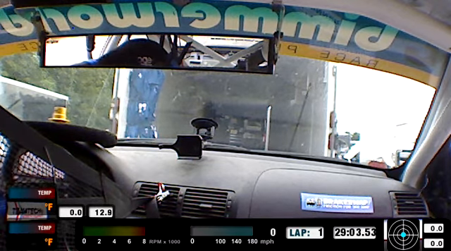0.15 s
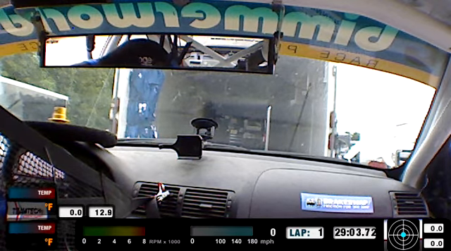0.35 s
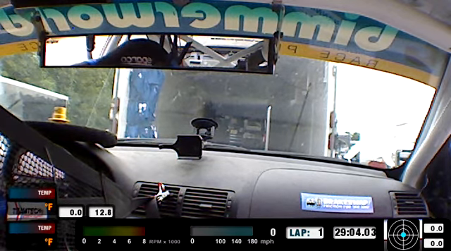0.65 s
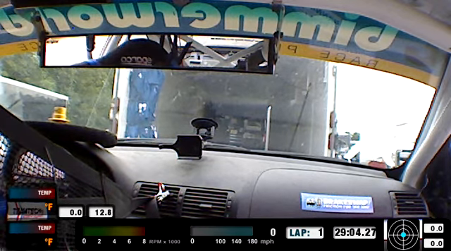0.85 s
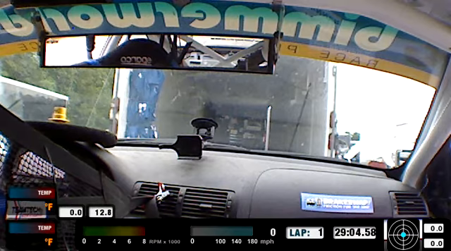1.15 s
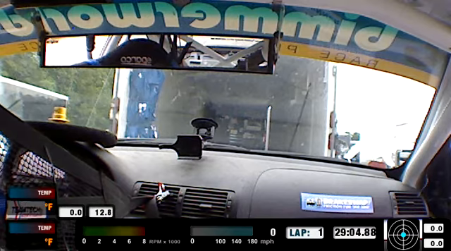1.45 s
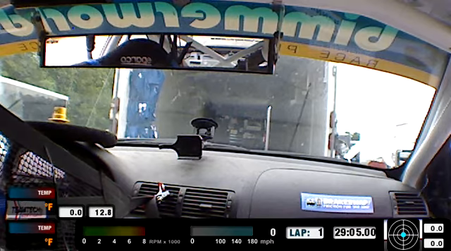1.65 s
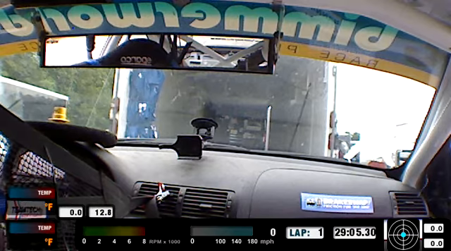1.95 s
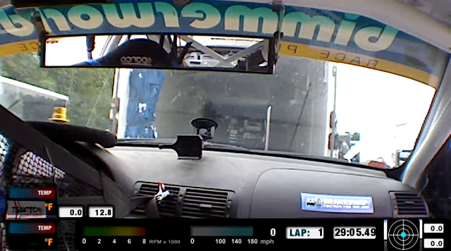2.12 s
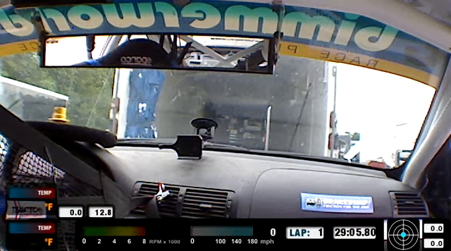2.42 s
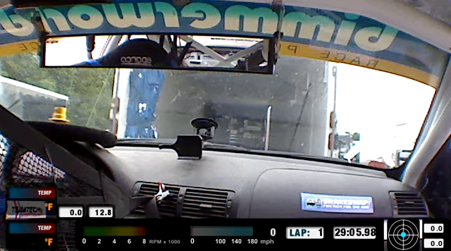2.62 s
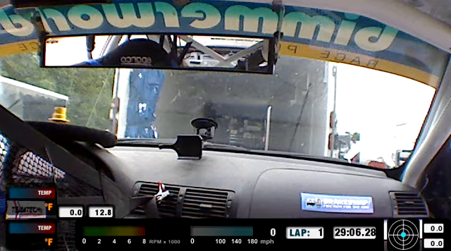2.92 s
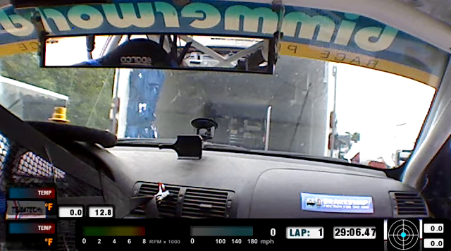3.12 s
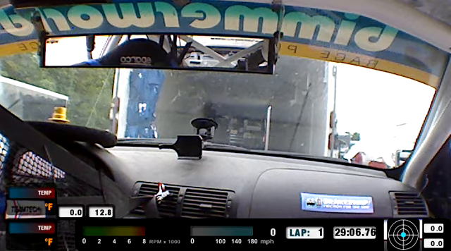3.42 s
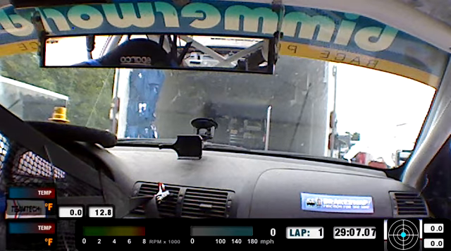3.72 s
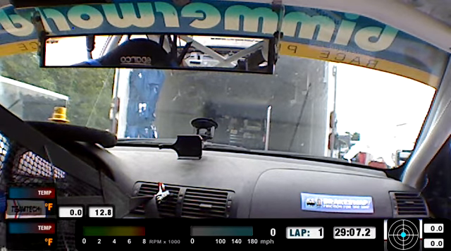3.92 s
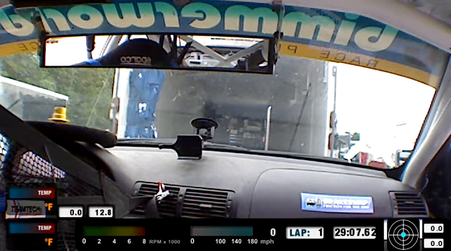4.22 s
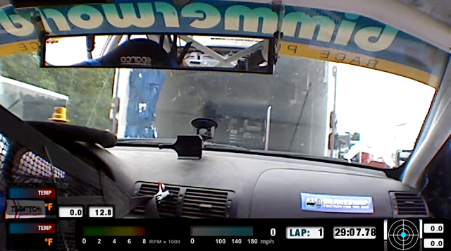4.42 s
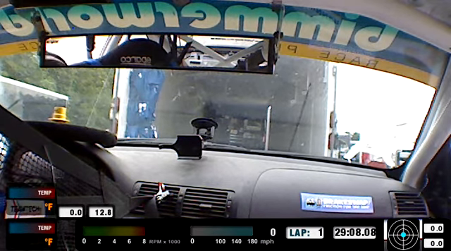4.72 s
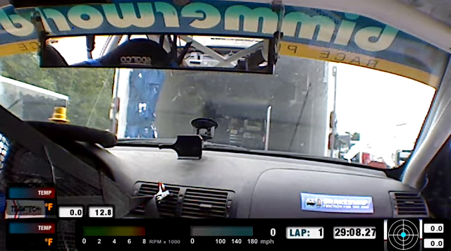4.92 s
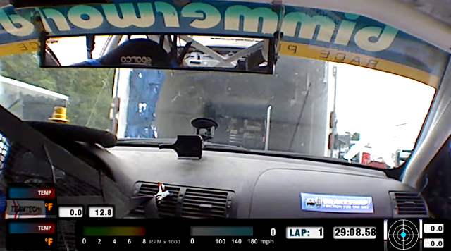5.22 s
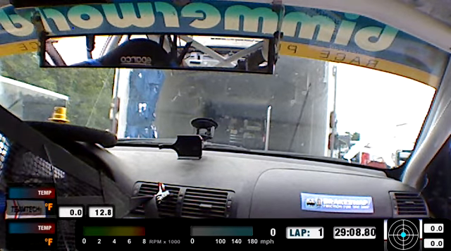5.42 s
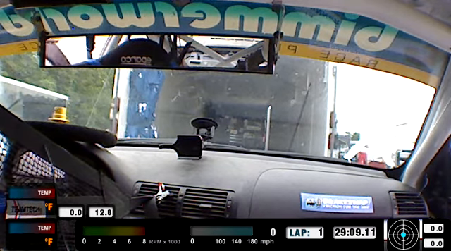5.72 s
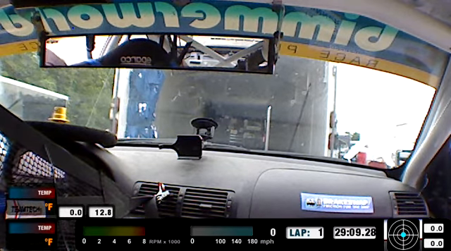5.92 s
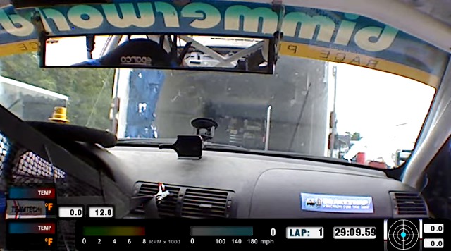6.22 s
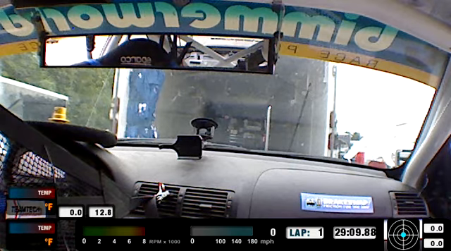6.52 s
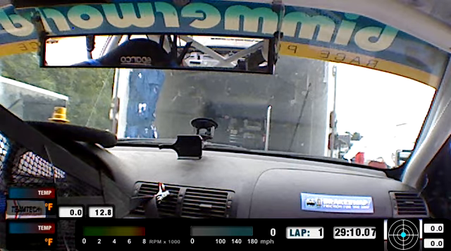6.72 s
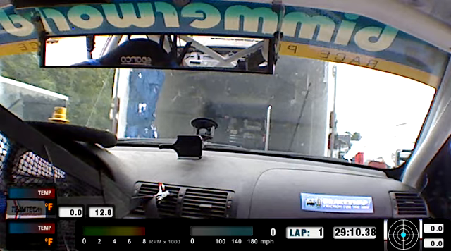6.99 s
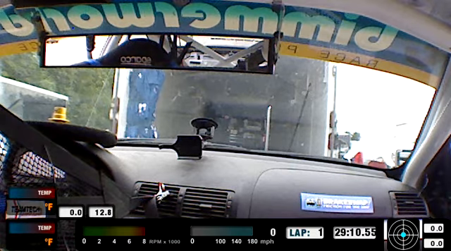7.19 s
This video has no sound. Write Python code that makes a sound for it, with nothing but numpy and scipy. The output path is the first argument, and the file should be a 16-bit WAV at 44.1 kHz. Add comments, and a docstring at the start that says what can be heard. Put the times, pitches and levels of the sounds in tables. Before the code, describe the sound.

Inside a parked race car with its engine off, a low rumble and the hum of distant idling engines come through the body. Harness straps rub and faintly squeak, fittings tick, and parts knock hollowly on the seat and trim. Near the middle a steel buckle clinks four times, followed by more rubbing and knocks. Two far cars pull away, and the cabin microphone adds light hiss.

```python
"""First comes a low rumble with the hum of far-off cars, heard inside a parked race car, engine off.
The driver handles the harness: straps and suit rub and squeak, fittings tick, and parts knock on
the seat and trim. Near the middle a steel buckle clinks four times in the small, hard cabin.
Outside, engines idle and two cars pull away. The onboard recorder adds hiss and a thin whine."""
import sys
import numpy as np
from scipy import signal
from scipy.fft import rfft, irfft
from scipy.io import wavfile
from scipy.ndimage import uniform_filter1d

SR = 44100
rng = np.random.default_rng(int(sys.argv[2]) if len(sys.argv) > 2 else 0)


def persist_wave(psi):
    """Save psi, clipped to +-1, as 16-bit WAV."""
    counts = np.round(np.clip(psi, -1, 1) * 32767).astype(np.int16)
    wavfile.write(sys.argv[1], SR, np.atleast_2d(counts).T)


N = 324135
TIME = np.arange(N) / SR
HIT_TIME = TIME[:SR // 2]

# Levels are relative: the functions may add gains. t60 is the time a ring takes to fall by 60 dB.
# outdoor rumble and recorder hiss: f/Hz, level/dB
RUMBLE_SPECTRUM = [(20, -13.5), (30, -5), (42, -0.5), (58, -9), (75, -7.5), (100, -1), (118, -5),
                   (145, -13.5), (215, -8.5), (260, -17.5), (350, -20.5), (500, -21.5), (700, -39.5),
                   (1000, -50), (2000, -46)]
HISS_SPECTRUM = [(200, -15), (1000, 1), (2000, -3.5), (3000, -4), (5000, -5), (7300, -3), (8500, 4)]
# the recorder's whine: f/Hz, level/dB
WHINE_TONES = [(2665, -90), (5335, -93.5)]
# the car rocks as weight shifts: t/s, level/dB, f/Hz, length/s
BODY_ROCKS = [(0.0, -56, 44.7, 0.14), (0.187, -50.5, 42, 0.11), (0.396, -51.5, 35.8, 0.099),
              (0.85, -50, 44.2, 0.59), (2.322, -44.5, 38.5, 0.11), (6.1, -57.5, 38, 1.14)]
# idling engines, one list each: t/s, firing rate/Hz, level/dB
IDLING_ENGINES = [
    [(0, 80, -67), (1.1, 80, -57), (3.3, 76, -56), (5.2, 73, -61), (7.35, 77.76, -57)],
    [(0, 90, -46.5), (.5, 95, -70), (.85, 108, -55), (1.3, 113, -51), (2.3, 113, -61.5), (4.8, 116, -58.5),
     (6.2, 118, -70.5), (7.35, 118, -62.5)],
]
# the first car idles, then pulls away: t/s, firing rate/Hz, level/dB
FIRST_CAR_PATH = [(0, 51.2, -57.5), (.3, 49.1, -56.5), (.58, 47.98, -67), (.9, 50.16, -53),
                  (1.5, 51.07, -53.5), (1.9, 54.06, -53), (2.3, 57.85, -53), (2.65, 60.75, -63.5),
                  (3.9, 59, -79)]
# the second car moves off: t/s, level/dB
SECOND_CAR_LEVELS = [(3.5, -59), (3.9, -60), (4.2, -56), (4.8, -57), (5, -69), (5.2, -62), (5.55, -63),
                     (5.8, -57.5), (6.2, -61.5), (6.5, -65), (6.95, -62), (7.25, -57), (7.35, -58.5)]
# each car's overtones: multiple of the firing rate, level/dB
FIRST_OVERTONES = [(3, -29), (5, -19.5), (6, -33)]
SECOND_OVERTONES = [(3, 1), (4, -17.5), (5, -12), (6, -18)]
# straps and suit slide over the seat: t/s, length/s, rise/s, drag/dB, rustle/dB, swish/dB
RUB_STROKES = [(0.268, 0.067, 0.048, -60.5, -65.5, -71), (0.413, 0.073, .04, -58.5, -69, -76.5),
               (0.524, 0.082, 0.024, -54, -67.5, -72.5), (0.655, 0.048, 0.021, -57, -71.5, -74),
               (0.732, 0.071, 0.033, -63, -82, -88), (0.799, 0.073, 0.056, -76, -73, -78.5),
               (0.866, 0.056, 0.046, -60, -63.5, -67), (0.94, 0.066, 0.033, -67, -76, -76.5),
               (0.958, 0.21, 0.13, -59, -78, -84), (1.17, 0.089, 0.028, -60.5, -74, -80.5),
               (1.275, 0.047, 0.022, -62.5, -79, -79), (1.333, .07, 0.022, -59.5, -72, -70),
               (1.397, 0.11, 0.025, -60.5, -73.5, -75.5), (2.146, 0.06, 0.025, -56, -91, -100),
               (2.293, .065, .04, -59.5, -78.5, -86), (3.026, 0.42, .03, -56, -73.5, -72.5),
               (3.404, 0.095, 0.046, -52.5, -61.5, -70), (3.528, .14, 0.039, -49.5, -63, -65),
               (3.653, .15, 0.025, -51, -68.5, -77), (3.904, .1, 0.033, -56.5, -70, -81),
               (4.639, 0.023, .012, -57, -69, -70.5), (4.684, 0.13, 0.045, -69, -81, -89),
               (4.897, 0.066, 0.053, -63.5, -80, -83), (5.07, 0.1, 0.075, -59.5, -71.5, -73.5),
               (5.324, 0.13, .02, -64, -78, -94), (5.546, 0.032, 0.034, -66, -77, -69.5),
               (5.89, 0.078, 0.048, -70, -75, -77), (5.961, 0.12, .04, -67, -77.5, -87),
               (6.203, 0.037, .015, -61.5, -72, -81), (6.241, 0.061, 0.032, -58, -73.5, -74.5),
               (7.0, 0.24, 0.17, -66.5, -87, -92)]
# the low, middle and high parts of a rub: f/Hz, level/dB
DRAG_SPECTRUM = [(160, -39), (280, -6), (327, 1), (392, -1.5), (486, 4.5), (528, 0), (600, -7.5),
                 (712, -17.5), (900, -21), (1170, -42), (1980, -120)]
RUSTLE_SPECTRUM = [(500, -2), (800, -3), (1250, 1.5), (1900, -3), (2400, -2.5), (3200, -13.5),
                   (5000, -20.5)]
SWISH_SPECTRUM = [(1800, -13.5), (2500, -5.5), (2850, 4), (3000, 6.5), (3150, -4.5), (3500, -2),
                  (4500, -8.5), (6200, -6.5), (8000, -23)]
# a strap sticks and slips: t/s, length/s, start f/Hz, end f/Hz, level/dB
STRAP_SQUEAKS = [(0.437, 0.082, 1225, 1215, -75), (0.837, 0.088, 1019, 996, -76.5),
                 (.975, 0.21, 525, 546, -56.5), (3.67, 0.11, 850, 795, -66), (3.698, .075, 1267, 1197, -65)]
# modes, the notes a part rings with when struck: f/Hz, level/dB, t60/s
SEAT_MODES = [(106, -4, 0.037), (152.5, 0, 0.26), (185, -4, 0.62), (218.6, 2.5, 0.37), (252, 0, 0.27),
              (289.1, -1, 0.41), (310, -2, 0.23)]  # the seat shell
PANEL_MODES = [(318.7, 1, 0.21), (343.2, -1, 0.21), (371.5, 2, 0.19), (390.3, -8, 0.35),
               (429.5, -1.5, 0.25), (459, -1, 0.13), (491.8, 5.5, 0.12), (539, -1, 0.16), (630, -12.5, 0.3)]  # seat, trim and cabin air together
TRIM_MODES = [(700, -2.5, 0.21), (1003, 1.5, 0.14), (1108, -1.5, 0.18), (1238, -2.5, 0.067),
              (1410, 1.5, 0.04), (1585, -3.5, 0.19), (1840, -15, 0.06), (2317, 3, 0.047), (2830, 0, 0.14),
              (3150, 2, 0.08)]  # hard plastic and thin metal
LATCH_MODES = [(2250, -15, 0.12), (2407, -4, 0.096), (2440, 4, 0.1), (3047, -5, 0.087), (4890, -7, 0.074),
               (5020, -19, 0.23), (5460, -18.5, 0.19)]  # the buckle's latch
TONGUE_MODES = [(3770, -7, 0.65), (3960, -6, 0.19), (3700, -3, 0.36), (4000, 0, 0.12), (4040, -1, 0.23),
                (4440, -8, 0.32)]  # its steel tongue
# the lower and upper parts of contact noise: f/Hz, level/dB
CRACK_SPECTRUM = [(300, -27.5), (600, 6.5), (850, -10), (1050, -5), (1400, -2), (1650, -2), (2000, -9),
                  (2500, -10.5), (3100, -17), (3800, -18.5), (5500, -33)]
TREBLE_SPECTRUM = [(1500, -9.5), (2500, -1), (3100, 0.5), (3500, -0.5), (4000, -4.5), (5200, -6),
                   (6200, -15.5), (7300, -21.5), (9000, -13)]
# strap fittings tap: t/s, crack/dB, treble/dB
FITTING_TICKS = [(0.431, -66.5, -89), (0.533, -70, -66.5), (1.338, -69, -82), (1.785, -70, -75),
                 (2.214, -73, -90.5), (2.873, -62.5, -87), (2.897, -51, -53.5), (3.112, -46, -58.5),
                 (3.311, -69.5, -64), (3.366, -59, -71.5), (3.539, -58, -64), (4.646, -71, -68.5),
                 (4.762, -68.5, -87), (5.133, -71, -68.5), (5.332, -67, -75), (6.218, -70, -81),
                 (7.267, -71.5, -73.5)]
# blows on seat and trim: t/s, thud/dB, thud centre/Hz, crack/dB, boom/dB, treble edge/Hz
SEAT_KNOCKS = [(0.202, -56.5, 600, -73.5, -57.5, 4600), (0.328, -42.5, 575, -73, -46.5, 3170),
               (0.372, -49.5, 440, -71, -57, 3060), (0.656, -58, 540, -62.5, -70, 2500),
               (2.1, -41.5, 439.3, -53, -61, 3900), (2.114, -35, 444, -58.5, -52, 6270),
               (2.75, -46.5, 412, -52.5, -62.5, 5060), (2.764, -40.5, 450, -58.5, -58.5, 7800),
               (3.439, -52.5, 644, -58.5, -59.5, 3730), (3.758, -53, 546, -81, -60, 4260),
               (3.783, -50.5, 540, -71, -71, 4230), (3.819, -50, 553, -68, -61, 4230),
               (3.906, -55, 455, -64, -61, 3200), (4.113, -57, 546, -79, -65, 2500),
               (4.349, -37.5, 373, -52, -52, 3600), (4.351, -44.5, 602, -60, -54.5, 2260),
               (4.421, -52.5, 479, -79, -71, 2000), (5.546, -54.5, 510, -80, -76, 3970),
               (5.588, -51, 483, -82, -71, 5000)]
# the buckle: t/s, thud/dB, thud centre/Hz, crack/dB, treble/dB, latch/dB, tongue/dB, boom/dB
BUCKLE_CLINKS = [(2.901, -40, 510, -47, -49, -48, -44.5, -57),
                 (2.981, -39, 314, -50, -42.5, -41, -53, -52.5),
                 (3.117, -38, 414, -44.5, -47.5, -70, -58, -51.5),
                 (3.187, -40, 445, -48, -48.5, -48.5, -50, -55.5)]


def undb(db):
    """Turn decibels into a gain."""
    return 10 ** (np.asarray(db) / 20)


def unit(x):
    """Scale to an average (rms) level of 1."""
    return x / np.sqrt(np.mean(x ** 2))


def unit_attack(x):
    """Scale a blow so that its first 25 ms have an rms level of 1."""
    return x / np.sqrt(np.mean(x[:SR // 40] ** 2))


def add(track, s, sound):
    """Mix a sound in at s seconds."""
    start = max(int(s * SR), 0)
    track[start:start + len(sound)] += sound[:N - start]


def colour(x, spectrum, size=8192):
    """Filter a sound so that it follows a spectrum."""
    hz, db = np.transpose(spectrum)
    grid_hz = np.maximum(np.fft.rfftfreq(size, 1 / SR), 1)
    gain = undb(np.interp(np.log(grid_hz), np.log(hz), db))
    cepstrum = irfft(np.log(gain))
    cepstrum[1:size // 2] *= 2  # folded forward, so nothing rings before a blow
    cepstrum[size // 2 + 1:] = 0
    response = irfft(np.exp(rfft(cepstrum)))
    return signal.fftconvolve(x, response)[:len(x)]


def noise(spectrum):
    """Steady noise with the given spectrum."""
    return unit(colour(rng.standard_normal(N), spectrum))


def wander(rate_hz):
    """A smooth random drift with a spread of 1."""
    jagged = np.interp(TIME * rate_hz, np.arange(4096), rng.standard_normal(4096))
    return unit(uniform_filter1d(jagged, int(SR / rate_hz)))


def curves(rows):
    """A gate that is open from the first row to the last, then each column at every sample."""
    s, *columns = np.transpose(rows)
    gate = uniform_filter1d(1. * ((TIME >= s[0]) & (TIME <= s[-1])), SR // 50)
    return [gate] + [np.interp(TIME, s, column) for column in columns]


def car_body(rumble_db=-56):
    """Outdoor rumble booms in the car's shell, which also rocks softly as the driver moves."""
    out = undb(rumble_db + wander(8)) * noise(RUMBLE_SPECTRUM)
    for s, db, hz, length in BODY_ROCKS:
        t = TIME[:int(length * SR)]
        swell = np.sin(np.pi * t / length)
        add(out, s, undb(db) * np.sqrt(2) * swell * np.sin(2 * np.pi * hz * t))
    return out


def engine_tone(hz, multiple, flutter_db, flutter_hz):
    """One multiple of a far engine's firing rate, fluttering on its way through the air."""
    tone = np.sin(2 * np.pi * multiple * np.cumsum(hz) / SR)
    return unit(tone * undb(flutter_db * wander(flutter_hz)))


def idling_cars(waver=0.025):
    """Far engines idle unevenly; only their low notes get through the shell."""
    return sum(undb(db) * engine_tone(hz * (1 + waver * wander(10)), 1, flutter_db=5, flutter_hz=8)
               for _, hz, db in map(curves, IDLING_ENGINES))


def first_car(waver=0.012, idle_waver=0.023, throttle_db=11.5, full_throttle_hz_per_s=5.3):
    """An engine idles unevenly; pulling away steadies it and brings up its overtones."""
    gate, hz, db = curves(FIRST_CAR_PATH)
    climb = np.clip(np.gradient(hz) * SR / full_throttle_hz_per_s, 0, 1)
    throttle = uniform_filter1d(climb, SR // 5) ** 2
    # the low note swells as it passes a pitch at which the cabin resonates
    cabin_hz, width_hz, lift_db = 107.6, 1.9, 11.5
    boom_db = lift_db / (1 + ((2 * hz - cabin_hz) / width_hz) ** 2)
    hz = hz * (1 + (waver + idle_waver * (1 - throttle)) * wander(14))
    low_note = undb(boom_db) * engine_tone(hz, 2, flutter_db=1.5, flutter_hz=22)
    overtones = sum(undb(level) * engine_tone(hz, multiple, flutter_db=2.5, flutter_hz=10)
                    for multiple, level in FIRST_OVERTONES)
    return gate * undb(db) * (low_note + undb(throttle_db * throttle) * overtones)


def second_car(start_hz=63.97, cruise_hz=75.95, ease_s=2.15):
    """Another car gathers speed ever more slowly, so its pitch rises and levels off."""
    gate, db = curves(SECOND_CAR_LEVELS)
    moving_s = np.maximum(TIME - SECOND_CAR_LEVELS[0][0], 0)
    hz = cruise_hz - (cruise_hz - start_hz) * np.exp(-moving_s / ease_s)
    overtones = sum(undb(level) * engine_tone(hz, multiple, flutter_db=3, flutter_hz=11)
                    for multiple, level in SECOND_OVERTONES)
    return gate * undb(db) * overtones


def stroke(length_s, rise_s):
    """One slide speeds up, holds and dies away; a gentle start also ends gently."""
    t = TIME[:int(length_s * SR) + SR // 4]
    release_s = 0.024 + 0.23 * rise_s
    return np.minimum(t / rise_s, 1) * np.exp(-np.maximum(t - length_s, 0) / release_s)


def rubbing(slip_db=2, weave_db=2.4, grain_db=1.5):
    """Straps slide in small slips: the seat drones under them, the weave rustles and swishes."""
    slips = wander(45)
    layers = [unit(noise(DRAG_SPECTRUM) * undb(slip_db * slips))]
    for spectrum in (RUSTLE_SPECTRUM, SWISH_SPECTRUM):
        roughness = undb(weave_db * slips + grain_db * wander(900))
        layers.append(unit(colour(rng.standard_normal(N) * roughness, spectrum)))
    powers = np.zeros((3, N))
    for s, length, rise, *levels in RUB_STROKES:
        for power, db in zip(powers, levels):
            add(power, s, (undb(db) * stroke(length, rise)) ** 2)
    return np.sum(np.sqrt(powers) * layers, axis=0)


def squeaks(waver=0.0067, flutter_db=4.5):
    """The pitch follows the speed of the sliding strap; an uneven grip makes it waver."""
    out = np.zeros(N)
    speed = 1 + waver * wander(220)
    flutter = undb(flutter_db * wander(120))
    for s, length, start_hz, end_hz, db in STRAP_SQUEAKS:
        n, at = int(length * SR), int(s * SR)
        hz = np.linspace(start_hz, end_hz, n) * speed[at:at + n]
        tone = np.sin(2 * np.pi * np.cumsum(hz) / SR) * flutter[at:at + n]
        add(out, s, undb(db) * unit(tone * signal.windows.tukey(n, 0.3)))
    return out


def fade(t60, held_s=0):
    """A blow dies away, falling 60 dB every t60 seconds once held_s has passed."""
    return np.exp(-np.log(1000) * np.maximum(HIT_TIME - held_s, 0) / t60)


def ring(modes, rise_s, scatter_rad=3):
    """A struck part rings with several notes, which start out of step and build up over rise_s."""
    phases = scatter_rad * rng.standard_normal(len(modes))
    notes = sum(undb(db) * fade(t60) * np.sin(2 * np.pi * hz * HIT_TIME + phase)
                for (hz, db, t60), phase in zip(modes, phases))
    return unit_attack(notes * (1 - np.exp(-HIT_TIME / rise_s)))


def thud(centre_hz, octaves, floor_db, rise_s):
    """The spot that is hit favours panel notes near one pitch; they start nearly together."""
    modes = []
    for hz, db, t60 in PANEL_MODES:
        nearness = np.exp(-0.5 * (np.log2(hz / centre_hz) / octaves) ** 2)
        modes.append((hz, db + 20 * np.log10(undb(floor_db) + nearness), t60))
    return ring(modes, rise_s, scatter_rad=1)


def crack(spectrum, t60, direct_db, rise_s=0.0031, uneven_db=4):
    """A short contact, then uneven echoes off glass and bare metal that merge as they die."""
    paths, sizes = rng.standard_normal((2, len(HIT_TIME)))
    echoes = paths * undb(uneven_db * np.repeat(sizes, 16)[:len(paths)] * fade(0.3))
    contact = undb(direct_db) * fade(0.063)
    shape = (contact + fade(t60)) * (1 - np.exp(-HIT_TIME / rise_s))
    return unit_attack(colour(echoes * shape, spectrum))


def trim(scatter_db=4):
    """Each blow rings the cabin's trim with its own mix of notes."""
    modes = [(hz, db + scatter_db * rng.standard_normal(), t60) for hz, db, t60 in TRIM_MODES]
    return ring(modes, rise_s=0.00033)


def ticks():
    """Small fittings tap as the straps move."""
    out = np.zeros(N)
    for s, crack_db, treble_db in FITTING_TICKS:
        add(out, s, undb(crack_db - 7) * crack(CRACK_SPECTRUM, t60=0.17, direct_db=-8))
        add(out, s, undb(treble_db - 3) * crack(TREBLE_SPECTRUM, t60=0.1, direct_db=-2))
        add(out, s, undb(crack_db - 8) * trim())
        add(out, s, undb(crack_db - 1) * thud(680, octaves=0.6, floor_db=-12, rise_s=0.0018))
    return out


def knocks(firm_db=-38.5, firm_t60=0.46, usual_edge_hz=4100):
    """Parts hit the seat and trim: a boom, a hollow thud and a crack on top."""
    out = np.zeros(N)
    for s, thud_db, hz, crack_db, boom_db, edge_hz in SEAT_KNOCKS:
        add(out, s, undb(boom_db) * ring(SEAT_MODES, rise_s=0.0082))
        # a light blow stays in touch and is damped sooner
        damping = fade(firm_t60 * 2 ** ((thud_db - firm_db) / 10), held_s=0.017)
        add(out, s, undb(thud_db) * thud(hz, octaves=0.18, floor_db=-20, rise_s=0.003) * damping)
        # more crack than thud means the blow landed on the trim and rings it more
        trim_db = 0.5 + 0.4 * (crack_db - thud_db)
        clack = crack(CRACK_SPECTRUM, t60=0.23, direct_db=-6.5, rise_s=0.0028) + undb(trim_db) * trim()
        # a harder contact reaches higher into the treble and has more snap
        snap_db = -5 + 5 * np.log2(edge_hz / usual_edge_hz)
        snap = undb(snap_db) * crack(TREBLE_SPECTRUM, t60=0.2, direct_db=4)
        lowpass = signal.butter(6, edge_hz, fs=SR, output="sos")
        add(out, s, undb(crack_db) * signal.sosfilt(lowpass, clack + snap))
    return out


def buckle(seat_lag_s=0.00532):
    """Steel meets steel: latch and tongue ring, and the seat answers a moment later."""
    out = np.zeros(N)
    for s, thud_db, hz, crack_db, treble_db, latch_db, tongue_db, boom_db in BUCKLE_CLINKS:
        seat = undb(boom_db) * ring(SEAT_MODES, rise_s=0.025)
        seat += undb(thud_db - 4) * thud(hz, octaves=0.14, floor_db=-0.5, rise_s=0.005)
        clack = undb(crack_db - 1.5) * crack(CRACK_SPECTRUM, t60=0.22, direct_db=-3, rise_s=0.003)
        clack += undb(crack_db - 6) * trim()
        snap = undb(treble_db - 1) * crack(TREBLE_SPECTRUM, t60=0.17, direct_db=-19, rise_s=0.0017)
        latch = undb(latch_db) * ring(LATCH_MODES, rise_s=0.0021)
        tongue = undb(tongue_db - 5) * ring(TONGUE_MODES, rise_s=0.00089)
        tongue *= fade(0.2, held_s=0.083)  # free for a moment, then hand and strap damp it
        add(out, s, clack + snap + latch + tongue)
        add(out, s + seat_lag_s, seat)
    return out


def scene():
    """Everything that reaches the single cabin microphone."""
    background = car_body() + idling_cars() + first_car() + second_car()
    harness = rubbing() + squeaks() + ticks() + knocks() + buckle()
    return (background + harness)[None]


def record(dry, hiss_db=-69.5, top_hz=7600):
    """The recorder adds hiss and a faint electrical whine, and cuts the highest treble."""
    hiss = undb(hiss_db) * noise(HISS_SPECTRUM)
    whine = sum(undb(db) * np.sqrt(2) * np.sin(2 * np.pi * hz * TIME) for hz, db in WHINE_TONES)
    lowpass = signal.butter(22, top_hz, fs=SR, output="sos")
    return signal.sosfilt(lowpass, dry + hiss + whine)


dry = scene()
out = record(dry)
persist_wave(out)
```